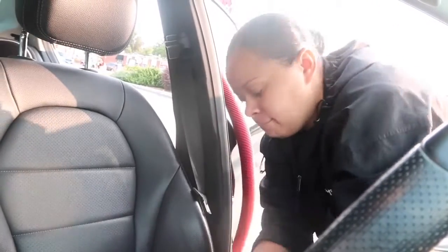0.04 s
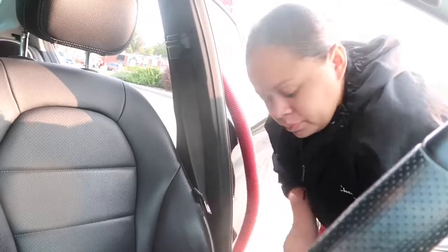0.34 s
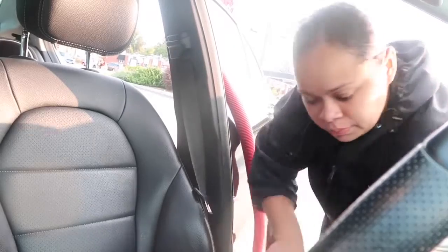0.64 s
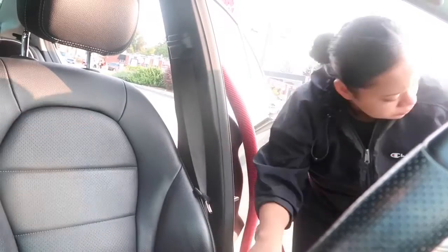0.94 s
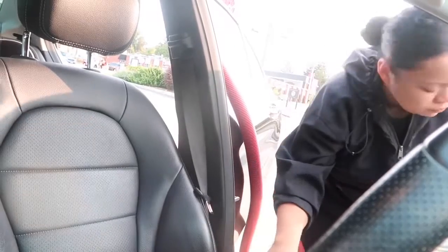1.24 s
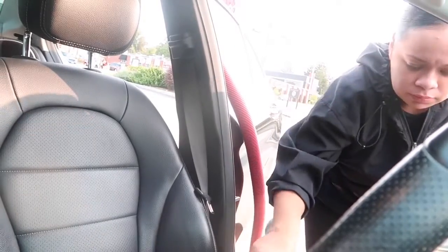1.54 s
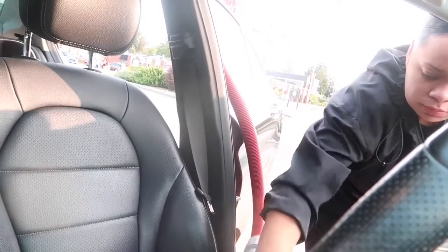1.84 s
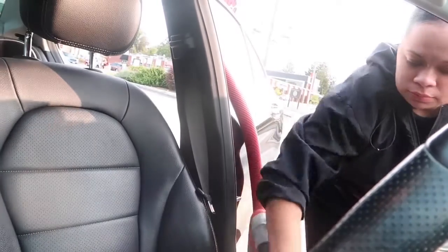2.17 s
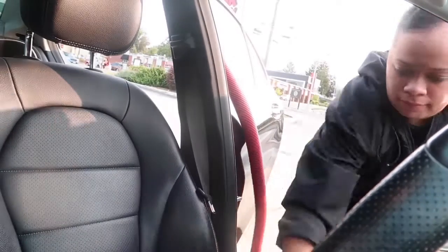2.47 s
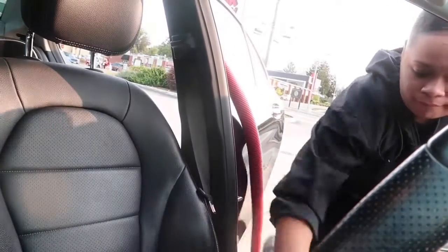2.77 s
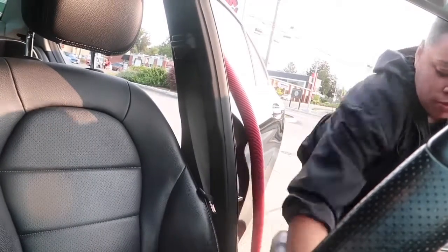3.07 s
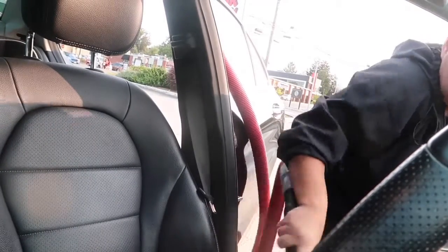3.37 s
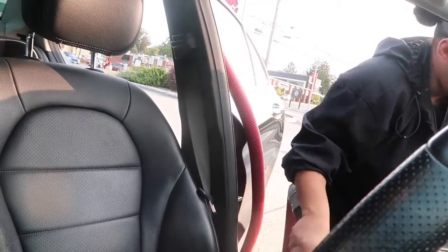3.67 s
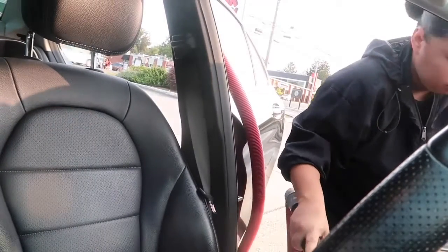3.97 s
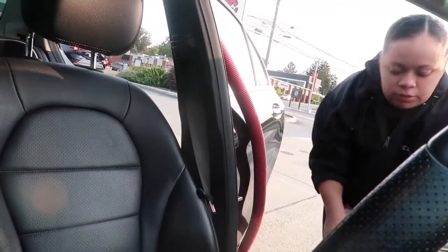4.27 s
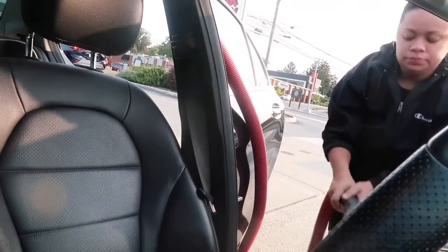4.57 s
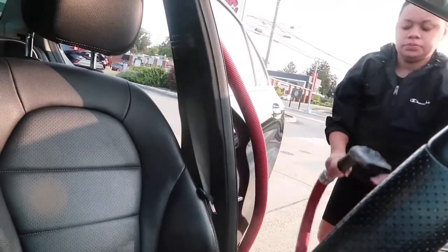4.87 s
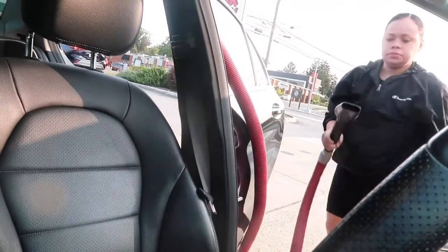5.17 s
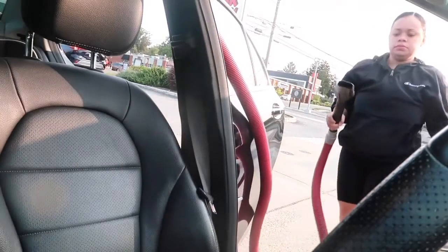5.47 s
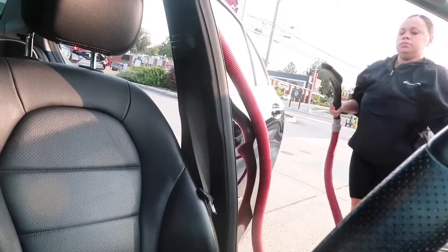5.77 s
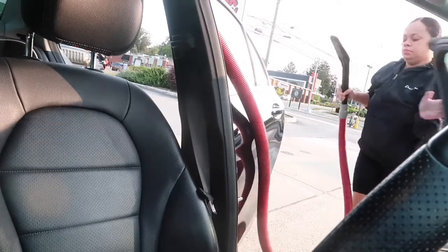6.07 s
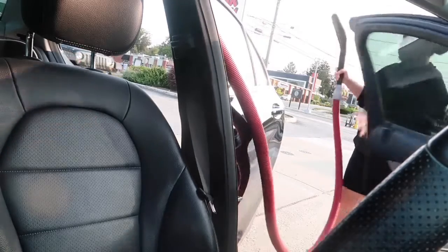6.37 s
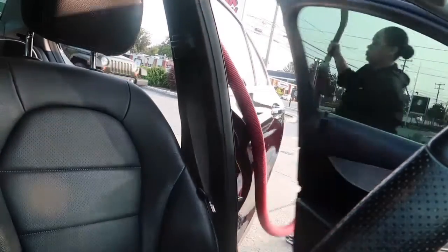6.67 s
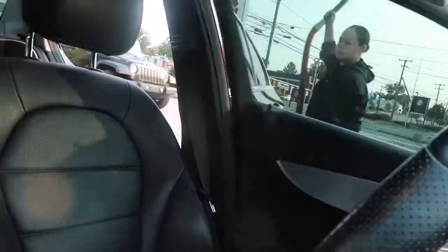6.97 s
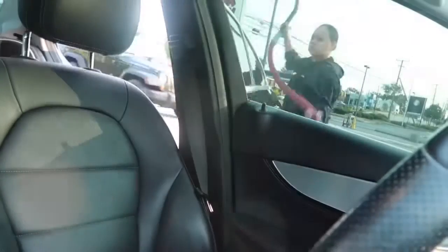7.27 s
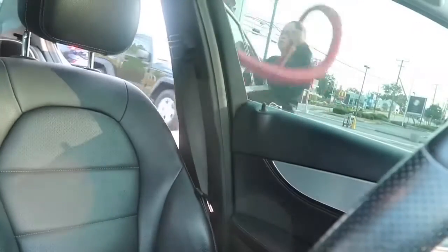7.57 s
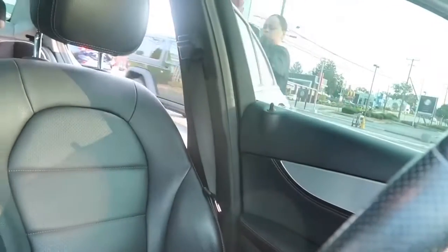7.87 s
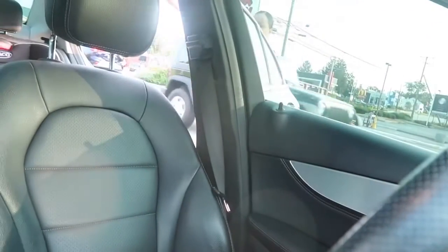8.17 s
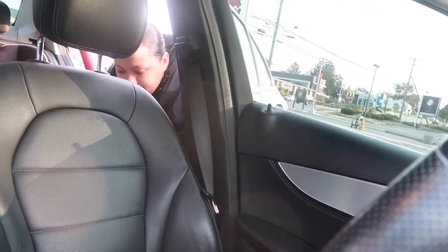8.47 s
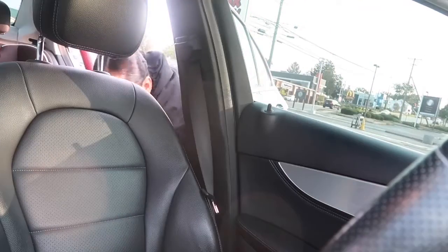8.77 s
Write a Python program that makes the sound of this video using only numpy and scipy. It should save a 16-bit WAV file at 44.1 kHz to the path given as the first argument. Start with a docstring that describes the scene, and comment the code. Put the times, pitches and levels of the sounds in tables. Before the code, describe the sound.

A vacuum nozzle works quickly over car carpet, hissing, whistling and slurping as it knocks against the trim. About halfway through it comes off the floor and the sound opens into a steady rush of air with a wavering whine. A car door shuts with a loud thud, muffling the vacuum, which gradually swells again before a short burst of closer suction. The microphone is inside the cabin.

```python
"""A car-wash vacuum heard inside a parked car, in three shots; two turbines beat under its air noise.
First, at double speed, the nozzle scrubs the carpet, whistling, scraping, slurping and knocking.
From 4 s, at normal speed, the lifted nozzle roars in free air. Soft bumps follow;
at 7 s the door slams and shuts the roar out, and the level creeps back up.
From 8.4 s, at double speed again, the nozzle is briefly at work by the rear seat."""
import sys
import numpy as np
from scipy import signal
from scipy.fft import rfft, irfft
from scipy.io import wavfile
from scipy.ndimage import uniform_filter1d

SR = 44100
rng = np.random.default_rng(int(sys.argv[2]) if len(sys.argv) > 2 else 0)


def master(y):
    """Save y as 16-bit WAV."""
    cut = np.clip(np.atleast_2d(y).T, -1, 1)
    pcm = np.round(cut * 32767)  # scale
    wavfile.write(sys.argv[1], SR, pcm.astype(np.int16))


N = 388962
T = np.arange(N) / SR
HZ = np.fft.rfftfreq(N, 1 / SR)


def amp(db):
    """Decibels to gain."""
    return 10 ** (np.asarray(db) / 20)


def unit_rms(x):
    """Scales to rms 1."""
    return x / np.sqrt(np.mean(x ** 2) + 1e-20)


def add(mix, start_s, sound):
    """Mixes a sound in place."""
    part = mix[round(start_s * SR):][:len(sound)]
    part += sound[:len(part)]


def follow(rows):
    """Rows of (seconds, values..) to one linear curve per value column."""
    times_s, *columns = np.transpose(rows)
    return [np.interp(T, times_s, column) for column in columns]


def swells(rows):
    """Rows of (middle, length, heights..) to one curve of smooth swells per height column."""
    return sum(np.outer(heights, np.cos(np.pi * np.clip((T - middle_s) / length_s, -.5, .5)) ** 2)
               for middle_s, length_s, *heights in rows)


def ramp(start_s, length_s):
    """Linear rise from 0 to 1."""
    return np.clip((T - start_s) / length_s, 0, 1)


def drift(rate_hz):
    """Slow random motion of rms 1."""
    return unit_rms(irfft(rfft(rng.standard_normal(N)) / (1 + (HZ / rate_hz) ** 4), N))


def spectrum(points):
    """Rows of (Hz, dB) to gain, interpolated over log frequency."""
    hz, db = np.transpose(points)
    return amp(np.interp(np.log(HZ + 1), np.log(hz + 1), db))


def below(edge_hz):
    """Low-side gain of a steep crossover."""
    return 1 / np.sqrt(1 + (HZ / edge_hz) ** 10)


def above(edge_hz):
    """High-side gain of the crossover."""
    return np.sqrt(1 - below(edge_hz) ** 2)


def resonance(f, hz, width_hz):
    """Bell curve of one resonance, peak 1."""
    return 1 / (1 + (2 * (f - hz) / width_hz) ** 2)


def cavity(peaks, pitch, ripple_db=1.2, first_s=.004, decay_s=.02):
    """Gain of an enclosure: resonances plus ripple from reflections, shifted by the factor pitch."""
    peaks_db = sum(db * resonance(HZ / pitch, hz, width_hz) for hz, width_hz, db in peaks)
    echoes = rng.standard_normal(N) * (T * pitch > first_s) * np.exp(-T * pitch / decay_s)
    return amp(peaks_db + ripple_db * unit_rms(rfft(echoes).real))


def ring(modes, pitch, rise_s, sign=1):
    """Decaying modes after a blow; sign -1 puts neighbours in antiphase."""
    t = T[:SR // 2]
    tones = sum(sign ** k * amp(db - 60 * t / t60_s) * np.sin(2 * np.pi * hz * pitch * t)
                for k, (hz, db, t60_s) in enumerate(modes))
    return tones * (1 - np.exp(-t / rise_s))


def restless(air, depth_db):
    """Changing gaps at a moving nozzle lay drifting patches of colour on the air noise."""
    frames = signal.stft(air, nperseg=512, noverlap=384)[2]
    patches = rng.standard_normal(frames.shape[1:])
    for _ in range(2):
        patches = uniform_filter1d(patches, size=3, axis=0)
        patches = uniform_filter1d(patches, size=18, axis=1)
    gain = unit_rms(amp(depth_db * unit_rms(patches)))
    return signal.istft(frames * gain, nperseg=512, noverlap=384)[1][:, :N]


# Stereo widths. Each row: frequency in Hz, side over mid in dB.
NARROW = [(100, -34), (2400, -63), (4400, -101), (6500, -26), (8500, -2), (12000, -0.5), (15000, 5.5)]
WIDE = [(100, -101), (400, -27), (1300, -23), (2400, -16.5), (4400, -3.5), (8000, 1.5), (11000, 29.5),
        (14000, 65)]

def flow(colour, width):
    """Turbulent stereo noise with a mid of rms 1."""
    mid, side = rfft(rng.standard_normal((2, N))) * colour
    mid, side = irfft(mid, N), irfft(side * spectrum(width), N)
    return np.array([mid + side, mid - side]) / np.std(mid)


# Turbine beating. Each row: time in seconds, beat rate in Hz at normal speed.
BEAT_RATE = [(5.2, 4.7), (5.55, 3.55), (5.8, 3.2), (6.25, 3.55), (7.03, 3.55), (7.17, 4.55), (7.7, 4.55),
             (8.15, 3.6), (8.4, 4.9)]
BASE_WHINE_HZ, BASE_HUM_HZ = 1654, 275.3

def motor(whine_db, hum_db, twin_db, shot_speed, in_step_s=6.41, waver=.0005):
    """Two turbines, the twin slightly slower, beat over the hum of their shafts."""
    rate = shot_speed * (1 + waver * shot_speed * drift(12 * shot_speed))
    rad_per_hz = 2 * np.pi * np.cumsum(rate) / SR
    beats = np.cumsum(shot_speed * follow(BEAT_RATE)[0]) / SR
    lag_rad = 2 * np.pi * (beats - np.interp(in_step_s, T, beats))
    whine_rad, hum_rad = BASE_WHINE_HZ * rad_per_hz, BASE_HUM_HZ * rad_per_hz
    whine = np.sin(whine_rad) + amp(twin_db) * np.sin(whine_rad - lag_rad)
    hum = np.sin(hum_rad) + amp(-6) * np.sin(2 * hum_rad)
    return amp(whine_db + drift(20 * shot_speed)) * whine + amp(hum_db + drift(4.2)) * hum


# Bumps on the car. Each row: middle in seconds, pitch in Hz, level in dB, number of cycles.
BUMPS = [(6.299, 134, -18, 4), (6.567, 150, -12.5, 3.2), (7.874, 154, -31, 4), (8.745, 165, -11, 2.8)]

def bumping():
    """A padded push swings a panel a few times, with no ring."""
    out = np.zeros(N)
    for middle_s, hz, db, cycles in BUMPS:
        t = T[:round(cycles / hz * SR)]
        add(out, middle_s - t[-1] / 2, amp(db) * np.hanning(len(t)) ** 2 * np.sin(2 * np.pi * hz * t))
    return out


# Trim modes. Each row: base frequency in Hz, level in dB, T60 in seconds.
TRIM_MODES = [(330, -17, 0.029), (474, -14, 0.03), (738, -10, 0.05), (905, -10, 0.055), (1017, -4.5, 0.044),
              (1210, -0.5, 0.022), (1860, -19, 0.032)]
# Nozzle hits. Each row: start in seconds, level in dB, pitch factor.
KNOCKS = [(0.297, -11.5, 0.91), (.748, -14.5, 0.88), (1.824, -18.5, 0.52), (2.67, -18.5, 0.82),
          (2.935, -25, 0.78), (3.263, -13, 0.78), (3.429, -8, 0.94), (3.51, -24, 0.73), (3.536, -26, 0.77)]

def knocking():
    """The plastic nozzle hits the floor trim, which rings briefly."""
    out = np.zeros(N)
    for start_s, db, pitch in KNOCKS:
        add(out, start_s, amp(db) * ring(TRIM_MODES, pitch, rise_s=.0022, sign=-1))
    return out


def through_gap(noise, hz, width_hz):
    """A small gap resonates and radiates no bass; output rms 1."""
    f = np.fft.rfftfreq(len(noise), 1 / SR)
    colour = resonance(f, hz, width_hz) * np.minimum(f / hz, 1) ** 2
    return unit_rms(irfft(rfft(noise) * colour))


# Nozzle gaps. Each row: middle and length in seconds, pitch and bandwidth in Hz, level in dB.
SLURPS = [(0.973, 0.22, 8500, 900, -33), (1.063, .14, 2550, 200, -26), (1.849, 0.55, 3400, 260, -27),
          (1.948, 0.45, 8160, 500, -30.5), (2.297, 0.21, 2560, 300, -23.5), (2.404, 0.7, 1580, 700, -28.5),
          (2.418, 0.72, 4180, 700, -27.5), (3.798, 0.69, 1600, 400, -32), (3.996, 0.2, 3260, 248, -24),
          (3.952, 0.23, 4550, 500, -24), (4.3, 0.13, 945, 130, -24), (4.787, 0.43, 1310, 350, -23),
          (4.831, 0.45, 2370, 500, -22.5)]

def slurping():
    """A gap opens, resonates in the air stream and closes."""
    out = np.zeros(N)
    for middle_s, length_s, hz, width_hz, db in SLURPS:
        air = through_gap(rng.standard_normal(SR), hz, width_hz)
        swell = np.hanning(round(length_s * SR))
        add(out, middle_s - length_s / 2, amp(db) * swell * air[:len(swell)])
    return out


# Edge scrapes. Each row: start and length in seconds, pitch and bandwidth in Hz, level in dB.
SCRAPES = [(0.213, 0.022, 5140, 2400, -18.5), (0.249, 0.046, 4150, 3200, -19.5),
           (0.328, .03, 3260, 2200, -22), (1.299, 0.017, 3100, 3000, -21), (2.463, 0.015, 2210, 500, -19.5),
           (2.675, 0.03, 4700, 3400, -23), (2.821, 0.029, 4300, 2200, -18),
           (2.967, .008, 4000, 3000, -22.5), (2.987, .007, 4800, 2400, -26),
           (3.029, 0.011, 2820, 2000, -20), (8.449, 0.03, 3800, 2200, -23), (8.487, 0.016, 4170, 900, -18)]

def scraping(grit_share=.42, fibres_per_s=1600, attack_s=.003, release_s=.0032):
    """The edge bites the pile; fibres flick past in a crackle that rings in the gap."""
    out, t = np.zeros(N), T[:SR]
    for start_s, length_s, hz, width_hz, db in SCRAPES:
        air, flicks = rng.standard_normal((2, SR))
        grit = unit_rms(flicks * (rng.random(SR) < fibres_per_s / SR))
        crackle = np.sqrt(1 - grit_share) * air + np.sqrt(grit_share) * grit
        envelope = np.minimum(t / attack_s, 1) * np.exp(-np.maximum(t - length_s, 0) / release_s)
        add(out, start_s, amp(db) * envelope * through_gap(crackle, hz, width_hz))
    return out


# Edge resonances. Each row: frequency and bandwidth in Hz, relative level in dB.
WHISTLE_MODES = [(6200, 120, 8.5), (6550, 210, 4), (6880, 140, 3), (7330, 170, 2)]
# Near-seals of the nozzle. Each row: start and release time in seconds, level in dB.
WHISTLES = [(0.048, 0.078, -20), (.39, .43, -24), (0.757, 1.13, -24), (1.105, 1.271, -19)]

def whistling(attack_s=.04, release_s=.027):
    """The jet over the nearly sealed edge sings unsteadily in narrow resonances."""
    colour = sum(amp(db) * resonance(HZ, hz, width_hz) for hz, width_hz, db in WHISTLE_MODES)
    envelope = sum(amp(db) * ramp(start_s, attack_s) * (1 - ramp(end_s, release_s))
                   for start_s, end_s, db in WHISTLES)
    return envelope * restless(flow(colour, NARROW), depth_db=.5)


# Door and body modes. Each row: base frequency in Hz, level in dB, T60 in seconds.
PANEL_MODES = [(35.3, -11, 0.38), (62.3, 2.5, 0.22), (116, -1, 0.22), (165.5, 1.5, 0.17), (194, 3, 0.13),
               (232, 3.5, 0.11), (270, 1, 0.1), (321, -5, 0.1), (480, -6, 0.1), (684, -4, 0.08)]
# Latch spectrum. Each row: frequency in Hz, density in dB.
LATCH_COLOUR = [(100, -7), (450, 5), (900, 1), (1400, 6), (2000, 3), (3200, 2.5), (4500, -9), (8000, -23),
                (15000, -52)]
# Slam, catch and rebound. Each row: start in seconds, boom and clack in dB, boom pitch factor.
DOOR_BLOWS = [(7.0151, -45, -5, 1.1), (7.0287, -12.5, -18, 1), (7.0300, -24, -3, 1.1),
              (7.0362, -40, -17, 1), (7.0545, -26, -16.5, 0.91), (7.066, -18.5, -36, 1.3),
              (7.091, -41, -35, 1.03)]

def door_slam(grind_s=.003, clack_t60_s=.016, tail_db=-31, tail_t60_s=.2):
    """Each blow booms in the panels; the latch grinds for an instant and stops with a clack."""
    boom, clack, t = np.zeros(N), np.zeros(N), T[:SR // 2]
    decay = amp(-60 * np.maximum(t - grind_s, 0) / clack_t60_s) + amp(tail_db - 60 * t / tail_t60_s)
    for start_s, boom_db, clack_db, pitch in DOOR_BLOWS:
        add(boom, start_s, amp(boom_db) * ring(PANEL_MODES, pitch, rise_s=.00085))
        add(clack, start_s, amp(clack_db) * decay)
    return boom + clack * flow(spectrum(LATCH_COLOUR), NARROW)


def door_seal_db(shut_s=7.024, seal_s=.022, shut_db=-21, creep_db_per_s=9.5):
    """Outside sound drops as the door seals; afterwards the level creeps back up."""
    return ramp(shut_s, seal_s) * np.minimum(shut_db + creep_db_per_s * (T - shut_s), 0)


def lift_db(start_s=4.26, length_s=.36, rise_db=4.5):
    """The lows build up as the nozzle leaves the floor."""
    return rise_db * (ramp(start_s, length_s) - 1)


def hose_drone(start_s=4.2, rise_s=.14, peak_db=-27, fade_db_per_s=20):
    """The hose resonates once as it is lifted, then dies away."""
    envelope = ramp(start_s, rise_s) * amp(peak_db - fade_db_per_s * np.maximum(T - start_s - rise_s, 0))
    return envelope * flow(resonance(HZ, hz=340, width_hz=90), WIDE)


# Hose and cabin peaks and notches. Each row: base frequency and bandwidth in Hz, gain in dB.
CABIN_PEAKS = [(150, 72, 5.0), (318, 39, 3.5), (434, 54, 7.5), (550, 39, 1.0), (612, 32, -6.5),
               (754, 39, 6), (835, 41, -4.5), (896, 43, 6), (969, 56, -2), (1153, 36, 4.5), (1223, 86, 2),
               (1500, 48, -6.5), (1524, 32, 5.0), (1592, 94, 10), (1670, 67, 6), (1800, 32, 3.0),
               (1880, 78, -3), (2020, 38, 5), (2153, 49, 6), (2350, 63, 6.5), (2400, 42, 4),
               (2590, 47, 3.5), (2620, 48, -2), (2700, 60, 5.5), (2960, 77, 5), (3090, 46, 9),
               (3120, 76, -7.5), (3279, 78, 5), (3420, 45, 2), (4140, 133, 3.5), (4470, 56, -2),
               (4700, 132, 3.5), (5000, 120, 4), (5522, 63, 7), (5634, 95, -8)]
# Rear-seat air spectrum. Each row: frequency in Hz, density in dB.
REAR_COLOUR = [(30, -10), (150, -4.5), (350, 3.5), (700, -2.5), (1300, -5.5), (2400, 3.5), (4500, 0),
               (5800, -1.5), (6700, -7), (9500, -8.5), (12000, -13.5), (15500, -23)]

def rear_suction(level_db=-19.5, cabin_share=.82):
    """Air hiss by the rear seat at double speed, with milder cabin resonances."""
    air = flow(spectrum(REAR_COLOUR) * cavity(CABIN_PEAKS, pitch=2) ** cabin_share, NARROW)
    return amp(level_db + .55 * drift(60)) * restless(air, depth_db=2)


# Free-air spectrum. Each row: frequency in Hz, density in dB.
ROAR_COLOUR = [(20, -15), (60, -4.5), (95, -7.5), (200, -3.5), (500, -7), (1000, -1.5), (1400, 1.5),
               (2400, 0), (3600, -5), (5000, -8.5), (6300, -14.5), (8800, -22.5), (10500, -42.5),
               (15000, -97)]
# Nozzle swings. Each row: middle and length in seconds, rush and rumble gain in dB.
SWINGS = [(4.08, 0.25, -1, 1.5), (4.36, 0.11, -2, -2), (4.58, 0.25, -0.5, -0.5), (4.82, 0.49, 0, 4.5),
          (5.52, 0.078, 0.5, 2), (5.7, 1, 0.3, -0.1), (6.44, 0.096, 0.5, -1), (6.8, 0.71, -0.1, -1),
          (7, 0.067, 1, 2)]
# Mouth turned towards the car. Each row: middle and length in seconds, treble gain in dB.
TURNS = [(5.7, 1.3, 1.3)]

def roaring(level_db=-18, rumble_db=-10, buffet_db=-17.5, gust_db=.5):
    """Air rushes, rumbles and buffets into the lifted nozzle; the closing door damps it."""
    rush_swing_db, rumble_swing_db = swells(SWINGS)
    facing_db, = swells(TURNS)
    colour = spectrum(ROAR_COLOUR) * cavity(CABIN_PEAKS, pitch=.99)
    rush = flow(colour * above(1040), WIDE)
    treble = irfft(rfft(rush) * above(2500) ** 2, N)
    rush += (amp(facing_db) - 1) * treble
    rush = amp(rush_swing_db + gust_db * drift(35)) * restless(rush, depth_db=1)
    rumble = amp(rumble_db + rumble_swing_db) * flow(colour * below(887) * above(209), WIDE)
    buffet = amp(buffet_db + lift_db()) * flow(colour * below(152), WIDE)
    return amp(level_db + door_seal_db()) * (rush + rumble + buffet)


# Air spectrum on carpet. Each row: frequency in Hz, density in dB.
CARPET_COLOUR = [(30, -49), (150, -26), (230, -26.5), (320, -13), (450, -11.5), (700, -9.5), (1100, -5),
                 (1350, 0), (2500, 0.5), (4500, 6), (6500, -3), (9000, -9), (12000, -15), (15500, -19)]
# Nozzle peaks and notches. Each row: base frequency and bandwidth in Hz, gain in dB.
NOZZLE_PEAKS = [(875, 68, 1), (1105, 93, -4), (1700, 156, 1.0), (2130, 193, -4.5), (2310, 130, 0.5),
                (2604, 200, 6), (2930, 195, -5), (3200, 120, 6.5), (3380, 103, 3), (3652, 190, -3),
                (4340, 158, -4), (4820, 120, 4), (5300, 147, -1.5), (5640, 229, -4), (6917, 180, -0.5),
                (7280, 150, 3.5), (7970, 470, -4), (8400, 210, 1.5)]
# Slow passes. Each row: time in seconds, then hiss, fizz relative to hiss, and draw gains in dB.
PASSES = [(0, -21.5, -8.5, -27), (.48, -25.5, -5.5, -33), (.6, -22.5, -7, -29), (.89, -19.5, -3, -33.5),
          (1.23, -23, -4.5, -34.5), (1.43, -24.5, -6.5, -31.5), (1.68, -21, -7.5, -26.5),
          (1.99, -18.5, -5.5, -28), (2.21, -18.5, -10, -29.5), (2.33, -18.5, -5.5, -33),
          (2.55, -18.5, -7.5, -34), (2.75, -24, -7.5, -34.5), (3.11, -26, -6, -37.5),
          (3.3, -25.5, -6.5, -31.5), (3.67, -20, -9.5, -29.5), (4.04, -19, -6.5, -26)]
# Jabs into the pile. Each row: middle and length in seconds, gain in dB.
JABS = [(.065, 0.077, 2.5), (.245, 0.23, 2.5), (.352, 0.062, 3), (.43, 0.084, 3.5), (2.6, .05, 3),
        (2.69, 0.042, 2.5), (2.825, 0.18, 4.5), (3.18, 0.051, 2.5), (3.55, 0.21, 3)]
# Nozzle stuck to the carpet. Each row: middle and length in seconds, hiss and draw loss in dB.
CHOKES = [(.115, 0.093, 1.5, 7), (.32, 0.044, 1.5, 17), (.385, 0.044, -2, 3.5), (2.642, 0.073, 6.5, 5),
          (2.89, 0.054, -4.5, 6), (2.945, 0.05, 6, -1), (2.995, 0.068, -5, 0.5)]

def scrubbing(draw_trim_db=4, hiss_trim_db=-1.5, fizz_trim_db=2.5, jab_fizz_share=.92):
    """Air squeezes between nozzle and carpet: a hollow draw, a fluttering hiss, the fizz of fibres."""
    hiss_db, fizz_db, draw_db = follow(PASSES)
    jab_db, = swells(JABS)
    hiss_loss_db, draw_loss_db = swells(CHOKES)
    colour = spectrum(CARPET_COLOUR) * cavity(NOZZLE_PEAKS, pitch=.97)
    draw_gain = amp(draw_db - draw_loss_db + draw_trim_db + 1.04 * drift(33))
    draw = draw_gain * flow(colour * below(2650), NARROW)
    hiss = amp(hiss_trim_db) * flow(colour * above(2050) * below(6900), NARROW)
    fizz = amp(fizz_db + fizz_trim_db + jab_fizz_share * jab_db) * flow(colour * above(6340), NARROW)
    hiss_gain = amp(hiss_db + jab_db - hiss_loss_db + .99 * drift(49))
    return restless(draw + hiss_gain * (hiss + fizz), depth_db=1.98)


def gate(start_s, end_s, fade_s=.037):
    """Unity gain between two times, with short fades."""
    return np.clip(np.minimum(T - start_s, end_s - T) / fade_s, 0, 1)


# Turbine whine per shot. Each row: time in seconds, level in dB.
CARPET_WHINE = [(0, -38), (.8, -34), (1.5, -35), (1.65, -28.5), (2.03, -28), (2.15, -51), (3.2, -43),
                (3.7, -32), (4.04, -21.5)]
LIFTED_WHINE = [(4.1, -34), (4.85, -36), (5.3, -26.5), (5.6, -23.5), (5.85, -24), (6.12, -26), (6.43, -23),
                (6.7, -22), (7.15, -24.5), (7.6, -21), (8.15, -22), (8.4, -24.5)]
REAR_WHINE = [(8.5, -32), (8.65, -27), (8.82, -24)]

def scene(hum_seal_share=.71):
    """Three shots: carpet, free air, rear seat; the door blocks the hum less than the whine."""
    draw_db, seal_db = follow(PASSES)[2], door_seal_db()
    carpet = scrubbing() + whistling() + knocking()
    # Hum escapes with the drawn air.
    carpet += motor(follow(CARPET_WHINE)[0], hum_db=draw_db - 16.5, twin_db=-6, shot_speed=2)
    lifted = roaring() + hose_drone()
    lifted_hum_db = -33.5 + lift_db() + hum_seal_share * seal_db
    lifted += motor(follow(LIFTED_WHINE)[0] + seal_db, lifted_hum_db, twin_db=-1.5, shot_speed=1)
    rear = rear_suction() + motor(follow(REAR_WHINE)[0], hum_db=-35, twin_db=-14, shot_speed=2)
    vacuum = carpet * gate(-.05, 4.062) + lifted * gate(4.055, 8.428) + rear * gate(8.43, 8.9)
    return vacuum + slurping() + scraping() + bumping() + door_slam()


def record(dry, ceiling=.95, cutoff_hz=15750):
    """Clips the slam, then low-passes."""
    low_pass = signal.firwin(511, cutoff_hz, window=("kaiser", 9), fs=SR)
    return signal.oaconvolve(np.clip(dry, -ceiling, ceiling), low_pass[None], "same")


dry = scene()
out = record(dry)
master(out)
```